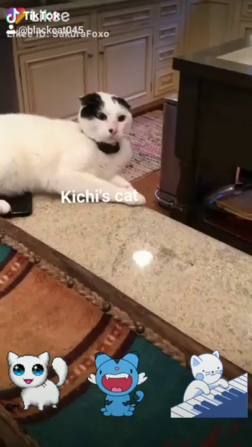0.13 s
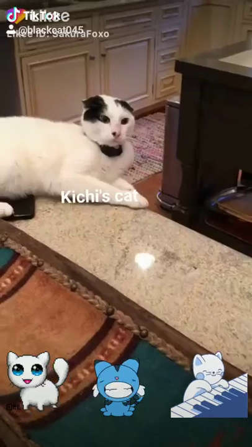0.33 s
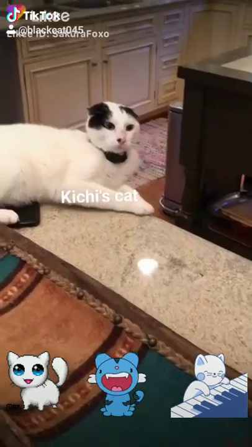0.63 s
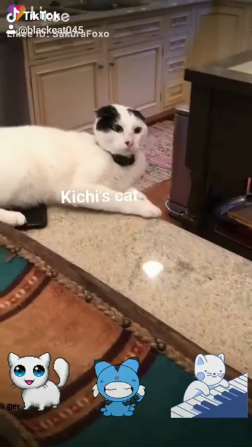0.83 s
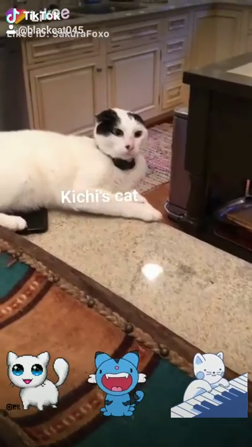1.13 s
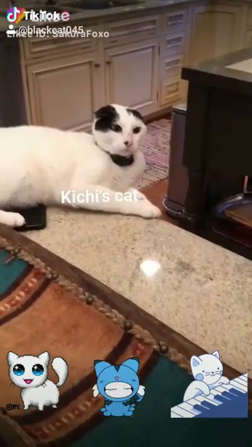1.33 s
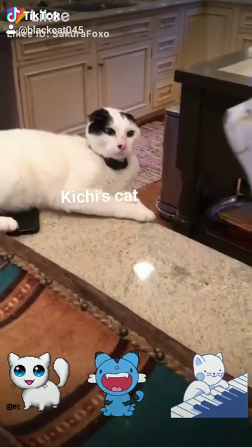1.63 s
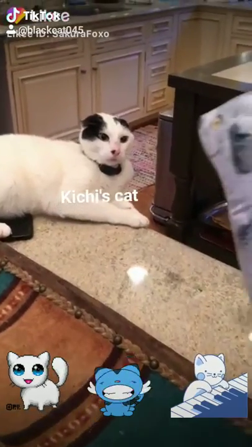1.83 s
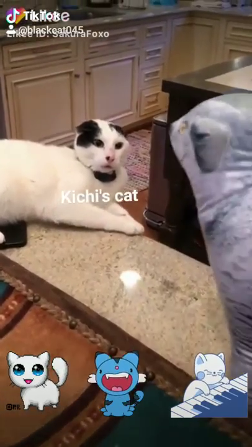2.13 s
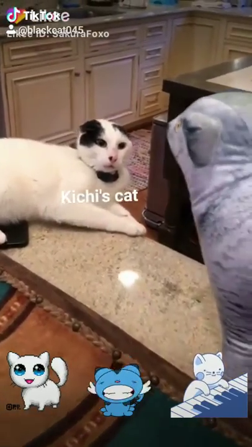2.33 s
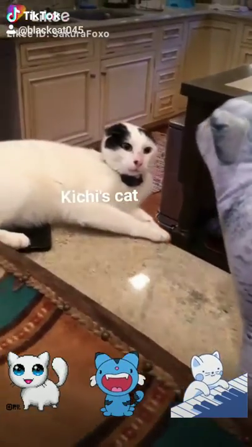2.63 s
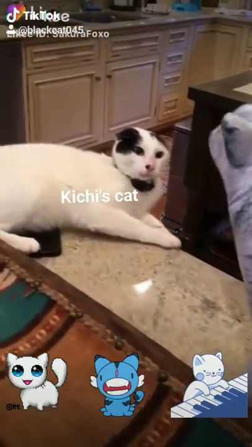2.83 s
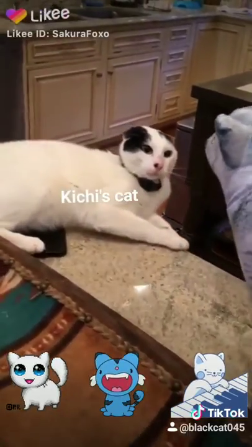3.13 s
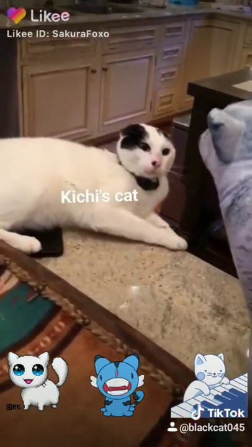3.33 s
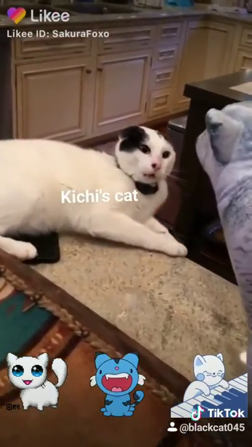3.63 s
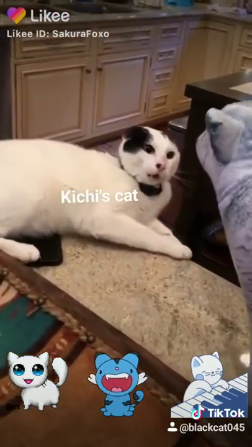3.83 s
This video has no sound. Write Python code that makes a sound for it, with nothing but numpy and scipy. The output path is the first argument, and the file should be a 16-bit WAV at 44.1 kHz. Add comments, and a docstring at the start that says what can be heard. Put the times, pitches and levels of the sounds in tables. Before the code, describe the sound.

A cat's rising yowl is the main sound. Silence until 0.4 s, then quiet kitchen rumble, appliance hum and hiss. Soft cloth brushes close by from about 1.5 to 2.3 s, followed by three faint handling ticks at 2.3-2.5 s. At 2.6 s a low, rough growl begins, climbs smoothly, opens around 3.3 s into a brighter yowl, and grows loud and strained until the abrupt cut at 4 s.

```python
"""A cat's low closed-mouth growl climbs over two octaves into an open yowl, in a kitchen.
Voice: two strong partials, overtones through nasal and moving throat resonances, pulsed turbulence.
Room: coloured noise for rumble and hiss, sines for appliance hum, a decaying-noise reverberation.
Near the microphone: cloth as grainy noise, faint handling ticks as short decaying noise bursts."""
import sys
import numpy as np
from scipy import signal
from scipy.fft import rfft, irfft, next_fast_len
from scipy.io import wavfile
from scipy.ndimage import map_coordinates

SR = 44100
rng = np.random.default_rng(int(sys.argv[2]) if len(sys.argv) > 2 else 0)


def file_out(sig):
    """Save sig as 16-bit WAV at sys.argv[1]."""
    # one column per channel
    cols = np.atleast_2d(sig).T
    # limit, then scale
    lim = np.clip(cols, -1, 1)
    pcm = np.round(lim * 32767).astype(np.int16)
    wavfile.write(sys.argv[1], SR, pcm)


N = 176400  # samples, 4 s

# rumble spectrum: (frequency [Hz], relative density [dB])
RUMBLE_SPECTRUM = [(12, -15.5), (20, -12.5), (59, 6), (77, 3), (92, -7.5), (108, -6), (155, -2), (182, 0),
                   (241, -2.5), (270, -5), (345, -6), (448, -15), (757, -42.5), (808, -34), (1000, -41),
                   (1300, -54.5), (2200, -120)]
RUMBLE_LEVEL_DB = -48.5
# appliance hum, before the common gain: (frequency [Hz], level [dB])
HUM_TONES = [(70.0, -70.5), (118.4, -60), (161.5, -61), (242.2, -59), (339.1, -68), (807.5, -74)]
HUM_GAIN_DB, HUM_PHASE_DRIFT_RAD = 0.5, 1.32
# broad hiss spectrum: (frequency [Hz], relative density [dB])
AIR_SPECTRUM = [(290, -30), (500, 0.5), (597, -1.5), (648, -2.5), (817, -3), (1160, -9.5), (1550, -7),
                (1800, -8), (2820, -7), (3610, -11.5), (4080, -12), (5290, -24), (6490, -23.5),
                (13000, -33.5)]
# broad hiss level, before its drift: (time [s], level [dB])
AIR_LEVEL_CURVE = [(.43, -58), (1.4, -59), (2.5, -58.5), (2.95, -60), (3.3, -57.5), (3.7, -59), (4, -56)]
AIR_DRIFT_DB = .5
# high hiss spectrum: (frequency [Hz], relative density [dB])
HISS_SPECTRUM = [(2000, -9), (5000, -3.5), (9000, -7.5), (13000, -11)]
# high hiss level: (time [s], level [dB])
HISS_LEVEL_CURVE = [(.43, -69), (.8, -68), (1.19, -65.5), (1.205, -75.5), (2.0, -80), (2.55, -73.5),
                    (2.85, -87), (3.2, -78), (4, -77)]

# cloth spectrum: (frequency [Hz], relative density [dB])
CLOTH_SPECTRUM = [(500, -11), (1100, -1.5), (1700, 8), (3000, 4), (5000, -10), (12000, -21)]
# cloth level, before its grain: (time [s], level [dB])
CLOTH_LEVEL_CURVE = [(1.45, -79), (1.6, -60.5), (1.8, -68.5), (1.95, -60.5), (2.08, -54.5), (2.16, -64),
                     (2.3, -76), (2.42, -87), (2.7, -86)]
CLOTH_GRAIN_DB, CLOTH_GRAIN_HZ = 3.3, 120
# handling ticks, level before decay and attack: (time [s], level [dB], centre [Hz])
HANDLING_TICKS = [(2.331, -51, 1400), (2.393, -47.5, 1900), (2.487, -43.5, 1260)]
TICK_T60_S, TICK_ATTACK_S, TICK_WIDTH_LOG_HZ = 0.022, 0.0015, 0.68  # width in natural-log frequency

# reverberation: (frequency [Hz], 60 dB decay time [s])
ROOM_T60 = [(200, 0.073), (700, 0.41), (1200, 0.96), (4000, 0.27), (10000, 0.047)]
REVERB_DB = -12  # gain of the unit-energy tail

# vocal-fold pitch in the growl: (time [s], pitch [Hz])
GROWL_PITCH_CURVE = [(2.6, 131.2), (2.63, 139.7), (2.66, 174), (2.68, 184.2), (2.758, 196.2),
                     (2.794, 217.9), (2.88, 242.2), (2.934, 265.3), (3.074, 307.2), (3.15, 317.1),
                     (3.23, 313.8)]
# vocal-fold pitch in the yowl: (time [s], pitch [Hz])
YOWL_PITCH_CURVE = [(3.26, 337), (3.358, 400.6), (3.388, 438), (3.42, 465.7), (3.487, 498.4), (3.566, 541),
                    (3.643, 551.7), (3.689, 574.2), (3.78, 576.7), (3.826, 585.3), (3.852, 605.3),
                    (3.879, 615.6), (3.936, 645.2), (3.962, 633.3), (4.0, 632.3)]
# two strong partials: (time [s], fundamental level [dB], octave level [dB])
STRONG_PARTIALS = [(2.58, -40, -60), (2.62, -45, -49.5), (2.66, -41.5, -49.5), (2.69, -44, -43.5),
                   (2.73, -50.5, -50), (2.78, -49, -51.5), (2.8, -63, -48.5), (2.855, -43, -58),
                   (2.89, -43, -41), (2.92, -62, -51), (2.96, -49, -46.5), (3.03, -43.5, -41.5),
                   (3.09, -58.5, -48), (3.16, -47, -40.5), (3.23, -47.5, -38), (3.32, -44, -43),
                   (3.42, -51, -51), (3.52, -50.5, -44.5), (3.61, -51, -39), (3.7, -45.5, -38),
                   (3.8, -45, -35), (3.843, -43.5, -29), (3.86, -44, -37.5), (3.875, -43, -32.5),
                   (3.908, -43.5, -32), (3.925, -43, -27), (3.97, -45.5, -26), (4.0, -43.5, -29.5)]
ONSET_S = 0.034
# third and fourth partials: level relative to the octave [dB]
WEAK_PARTIALS_DB = [-27.5, -40]
GROWL_WEAK_BOOST_DB = 10
GROWL_FADE_START_S, GROWL_FADE_S = 2.87, 0.066  # growl character gives way
STRAIN_START_S, STRAIN_RISE_S = 3.26, .15  # open yowl grows unsteady again

# throat resonances rising as the mouth opens:
# (time [s], low [Hz], level [dB], middle [Hz], level [dB], high [Hz], level [dB], valley level [dB])
THROAT_SHAPE = [(2.65, 1870, -89, 3400, -106, 4600, -95, -81),
                (3.12, 1820, -76, 3500, -68.5, 4530, -85, -89),
                (3.18, 1906, -64.5, 3424, -76, 4540, -83, -78),
                (3.28, 2050, -65, 3560, -63, 4700, -85, -91), (3.36, 2210, -54, 3620, -51, 5000, -76, -74),
                (3.43, 2159, -45.5, 3936, -46, 5070, -73, -76),
                (3.52, 2240, -40.5, 4013, -45, 5390, -68, -74.5),
                (3.62, 2325, -38, 4170, -52, 5420, -61.5, -74),
                (3.72, 2406, -44, 4320, -55, 5765, -60, -60),
                (3.8, 2460, -35, 4250, -53.5, 5720, -65.5, -58.5),
                (3.88, 2550, -51, 4124, -57, 5700, -58.5, -56.5),
                (3.96, 2550, -40, 4360, -57, 5904, -58, -55.5), (4.0, 2540, -37, 4400, -52, 5750, -68, -66)]
THROAT_WIDTH_HZ = 540
# gain between the resonances: (frequency [Hz], relative gain [dB])
VALLEY_SPECTRUM = [(900, 2.5), (1500, -14.5), (3000, -1.5), (3800, -2.5), (4800, -12.5), (6000, -10),
                   (7000, -36), (8050, -15), (8650, -22.5), (9250, -17), (11000, -45.5)]
# closed-mouth resonance: (time [s], level [dB])
NASAL_LEVEL_CURVE = [(2.6, -60), (2.7, -67), (2.78, -68), (2.84, -48.5), (2.92, -63.5), (3.05, -72)]
NASAL_HZ, NASAL_WIDTH_HZ = 720, 230
# open-mouth turbulence: (frequency [Hz], relative density [dB])
TURBULENCE_SPECTRUM = [(1500, -11.5), (2300, -11), (4200, -3), (5000, -11), (5700, 10), (7000, -19),
                       (9000, -2), (10500, -16), (13000, -18)]
TURBULENCE_RE_VALLEY_DB = -14  # before pulsing

# unsteadiness: scale of each random curve; growl and strain add to the base
JITTER_RATIO, GROWL_JITTER_RATIO, STRAIN_JITTER_RATIO, JITTER_HZ = .0025, 0.014, .0015, 100
SHIMMER_DB, GROWL_SHIMMER_DB, STRAIN_SHIMMER_DB, SHIMMER_HZ = .7, 1.0, .7, 70
FLICKER_DB, FLICKER_HZ = 3, 18  # separate for each overtone
RASP_DB = -26  # relative to each overtone
# brief level flutter as the voice strains upward
FLUTTER_CENTRE_S, FLUTTER_SPREAD_S, FLUTTER_HZ, FLUTTER_DEPTH_RATIO = 3.885, .04, 72.4, 0.28

START_S, FADE_IN_S, FADE_OUT_S = 0.4276, .001, .004
BAND_LIMIT_HZ = 13150


def amp(db):
    """Decibels to gain."""
    return 10 ** (np.asarray(db) / 20)


def unit(x):
    """Scale to rms 1."""
    return x / np.sqrt(np.mean(x ** 2) + 1e-20)


def along(points, hz):
    """Interpolate (frequency [Hz], value) on a log axis."""
    point_hz, values = np.transpose(points)
    return np.interp(np.log(hz + 1), np.log(point_hz + 1), values)


def curves(rows):
    """One value per sample for each column after the time."""
    time_s, *columns = np.transpose(rows)
    return [np.interp(np.arange(N) / SR, time_s, column) for column in columns]


def ramp(start_s, length_s):
    """Linear rise from 0 to 1."""
    return np.clip((np.arange(N) / SR - start_s) / length_s, 0, 1)


def wobble(rate_hz):
    """Smooth random curve through rate_hz Gaussian knots per second."""
    return map_coordinates(rng.standard_normal(N // 8), [np.arange(N) * rate_hz / SR], mode="wrap")


def filtered(x, response):
    """Shape the spectrum of x by a gain function of frequency."""
    size = next_fast_len(N + SR // 2)
    return irfft(rfft(x, size) * response(np.fft.rfftfreq(size, 1 / SR)), size)[:N]


def noise(spectrum):
    """Coloured noise of rms 1."""
    return unit(filtered(rng.standard_normal(N), lambda hz: amp(along(spectrum, hz))))


def appliance_hum():
    """Steady sines, each with a slowly drifting phase."""
    t = np.arange(N) / SR
    hum = np.zeros(N)
    for hz, db in HUM_TONES:
        phase = 2 * np.pi * hz * t + HUM_PHASE_DRIFT_RAD * wobble(4.973)
        hum += amp(db) * np.sqrt(2) * np.sin(phase)
    return amp(HUM_GAIN_DB) * hum


def room_tone():
    """Steady low rumble, hum, and two noise bands of varying level."""
    air_db, = curves(AIR_LEVEL_CURVE)
    hiss_db, = curves(HISS_LEVEL_CURVE)
    rumble = amp(RUMBLE_LEVEL_DB) * noise(RUMBLE_SPECTRUM)
    air = amp(air_db + AIR_DRIFT_DB * wobble(4.4)) * noise(AIR_SPECTRUM)
    hiss = amp(hiss_db) * noise(HISS_SPECTRUM)
    return rumble + appliance_hum() + air + hiss


def kitchen_reverb(x):
    """Noise tail after 5 ms; each frequency decays at its own rate."""
    hz, t, bins = signal.stft(rng.standard_normal(SR // 2), SR, nperseg=256)
    decay = amp(-60 * t / along(ROOM_T60, hz)[:, None])
    tail = signal.istft(bins * decay, SR, nperseg=256)[1]
    impulse = np.pad(tail, (SR // 200, 0)) / np.linalg.norm(tail)
    return signal.fftconvolve(x, impulse)[:N]


def cloth():
    """Brushing: coloured noise with fast random level grain."""
    level_db, = curves(CLOTH_LEVEL_CURVE)
    return amp(level_db + CLOTH_GRAIN_DB * wobble(CLOTH_GRAIN_HZ)) * noise(CLOTH_SPECTRUM)


def handling_ticks():
    """Dull ticks: band-shaped noise with exponential decay."""
    out = np.zeros(N)
    for start_s, db, centre_hz in HANDLING_TICKS:
        def band(hz):
            return 1 / (1 + (np.log((hz + 1) / centre_hz) / TICK_WIDTH_LOG_HZ) ** 2) ** 2
        age_s = np.maximum(np.arange(N) / SR - start_s, 0)
        body = unit(filtered(rng.standard_normal(N), band))
        out += amp(db - 60 * age_s / TICK_T60_S) * ramp(start_s, TICK_ATTACK_S) * body
    return out


def resonance(hz, centre_hz, width_hz):
    """Gain of one steep-sided resonance, 1 at its centre."""
    return 1 / (1 + (2 * (hz - centre_hz) / width_hz) ** 2) ** 2


def throat(hz, shape):
    """Gain of three moving resonances plus the valleys between them."""
    *peaks, valley_db = shape
    gain = amp(valley_db + along(VALLEY_SPECTRUM, hz))
    for centre_hz, db in zip(peaks[::2], peaks[1::2]):
        gain += amp(db) * resonance(hz, centre_hz, THROAT_WIDTH_HZ)
    return gain


def flutter():
    """Sinusoidal level flutter under a Gaussian envelope."""
    t = np.arange(N) / SR - FLUTTER_CENTRE_S
    envelope = np.exp(-(t / FLUTTER_SPREAD_S) ** 2)
    return 1 + FLUTTER_DEPTH_RATIO * envelope * np.sin(2 * np.pi * FLUTTER_HZ * t)


def cat(partial_count=18):
    """Vocal-fold harmonics, rough when low, brightening through the opening mouth."""
    pitch_hz, = curves(np.vstack([GROWL_PITCH_CURVE, YOWL_PITCH_CURVE]))
    first_db, octave_db = curves(STRONG_PARTIALS)
    nasal_db, = curves(NASAL_LEVEL_CURVE)
    shape = curves(THROAT_SHAPE)
    growl = 1 - ramp(GROWL_FADE_START_S, GROWL_FADE_S)
    strain = ramp(STRAIN_START_S, STRAIN_RISE_S)

    jitter = JITTER_RATIO + GROWL_JITTER_RATIO * growl + STRAIN_JITTER_RATIO * strain
    phase = 2 * np.pi * np.cumsum(pitch_hz * (1 + jitter * wobble(JITTER_HZ))) / SR

    voice = amp(first_db) * np.sin(phase) + amp(octave_db) * np.sin(2 * phase)
    orders = np.arange(3, partial_count + 1)
    for k, weak_db in zip(orders, WEAK_PARTIALS_DB):
        voice += amp(octave_db + weak_db + GROWL_WEAK_BOOST_DB * growl) * np.sin(k * phase)
    for k in orders:
        nasal = amp(nasal_db) * resonance(k * pitch_hz, NASAL_HZ, NASAL_WIDTH_HZ)
        gain = throat(k * pitch_hz, shape) + nasal
        # narrow noise band around the overtone
        rasp = wobble(550) * np.cos(k * phase) + wobble(500) * np.sin(k * phase)
        flicker = amp(FLICKER_DB * wobble(FLICKER_HZ))
        voice += gain * flicker * (np.sin(k * phase) + amp(RASP_DB) * rasp)

    # turbulence pulses once per vocal-fold cycle
    pulse = (1 + np.cos(phase)) / 2
    voice += amp(shape[-1] + TURBULENCE_RE_VALLEY_DB) * noise(TURBULENCE_SPECTRUM) * pulse

    shimmer_db = SHIMMER_DB + GROWL_SHIMMER_DB * growl + STRAIN_SHIMMER_DB * strain
    shimmer = amp(shimmer_db * wobble(SHIMMER_HZ))
    onset = ramp(STRONG_PARTIALS[0][0], ONSET_S)
    return np.sqrt(2) * voice * shimmer * onset * flutter()


def scene():
    """Cat with reverberation, over room tone, cloth and ticks."""
    voice = cat()
    reverb = amp(REVERB_DB) * kitchen_reverb(voice)
    return (voice + reverb + room_tone() + cloth() + handling_ticks())[None]


def record(dry):
    """Silence, abrupt start and end, then a steep low-pass at the band limit."""
    gate = ramp(START_S, FADE_IN_S) * ramp(0, FADE_OUT_S)[::-1]
    low_pass = signal.ellip(12, .1, 80, BAND_LIMIT_HZ, fs=SR, output="sos")
    return signal.sosfilt(low_pass, dry * gate)


dry = scene()
out = record(dry)
file_out(out)
```